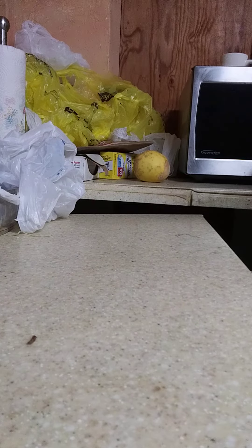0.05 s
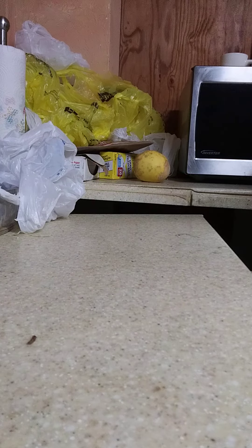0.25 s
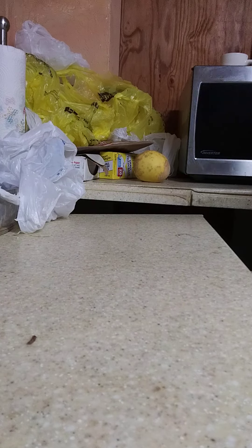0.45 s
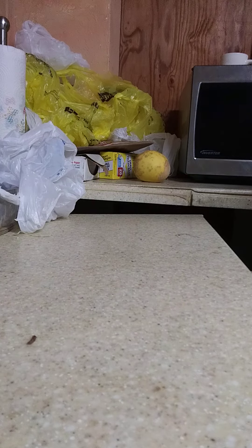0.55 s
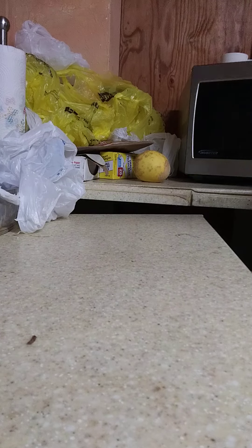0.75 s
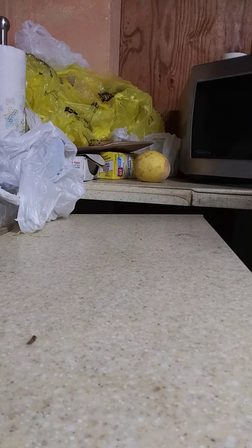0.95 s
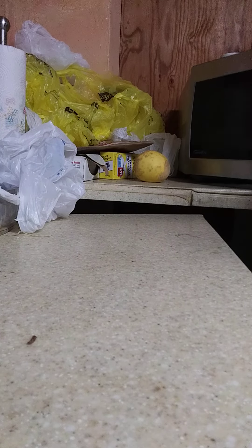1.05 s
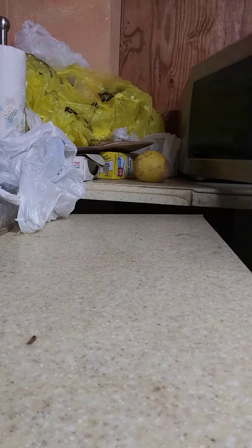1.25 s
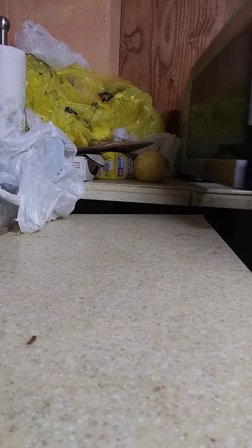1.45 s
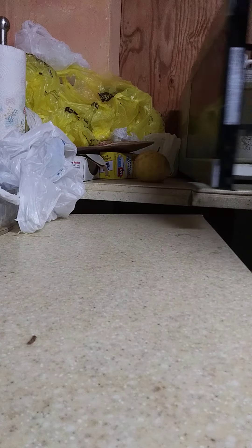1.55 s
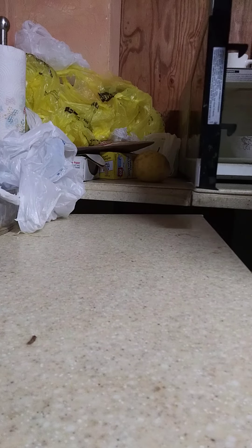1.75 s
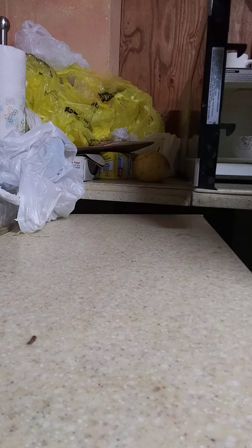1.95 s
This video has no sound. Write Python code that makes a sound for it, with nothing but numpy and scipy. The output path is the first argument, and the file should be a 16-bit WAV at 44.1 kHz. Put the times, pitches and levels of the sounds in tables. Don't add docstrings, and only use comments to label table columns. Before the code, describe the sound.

Close microphone in a home kitchen catches a microwave door being released, with ticks building to two loud metallic clunks, a few rattling knocks, then near quiet with slight hinge friction and tiny squeaks over steady room noise.

```python
import sys
import numpy as np
from scipy import signal
from scipy.io import wavfile

SR = 44100
rng = np.random.default_rng(int(sys.argv[2]) if len(sys.argv) > 2 else 0)


def unload_audio(sound):
    columns = np.transpose(np.atleast_2d(sound))
    steps = np.round(np.clip(columns, -1, 1) * 32767)
    wavfile.write(sys.argv[1], SR, steps.astype(np.int16))


def how_loud(loudness_db):
    steps = np.asarray(loudness_db, float) / 20
    return 10 ** steps


N = 88200


def rms_one(x):
    return x / np.sqrt(np.mean(x ** 2) + 1e-20)


def at_hz(points, hz):
    table_hz, values = np.array(points).T
    return np.interp(np.log(hz), np.log(table_hz), values)


def drift(rate_hz):
    step = 40
    r = np.exp(-2 * np.pi * rate_hz * step / SR)
    white = rng.standard_normal(N // step + 2002)
    slow = signal.lfilter([1], [1, -2 * r, r * r], white)[2000:]
    return np.interp(np.arange(N) / step, np.arange(len(slow)), rms_one(slow))


def resonance(x, hz, width_hz):
    r = np.exp(-np.pi * width_hz / SR)
    poles = [1, -2 * r * np.cos(2 * np.pi * hz / SR), r * r]
    return signal.lfilter([(1 - r * r) / 2, 0, (r * r - 1) / 2], poles, x)


def bands(size):
    edges = 22 * 2 ** np.arange(0, 9.7, 1 / 3)
    white = rng.standard_normal((2, size))
    out = []
    for k, (low, high) in enumerate(zip(edges, edges[1:])):
        band_filter = signal.butter(2, [low, high], "band", fs=SR, output="sos")
        out.append((np.sqrt(low * high), signal.sosfilt(band_filter, white[k % 2])))
    return out


def coloured(spectrum, patchy_db):
    return rms_one(sum(how_loud(at_hz(spectrum, hz) + patchy_db * drift(10)) * band for hz, band in bands(N)))


# start in seconds, chatter length in seconds, level in dB, colour in Hz, width in Hz.
KNOCKS = [(.000, 0.0032, -47.5, 630, 1470), (.002, 0.0074, -43.5, 2700, 1960),
          (.130, 0.021, -50, 690, 886), (.3696, 0.019, -32, 510, 253), (.127, 0.053, -40, 1810, 3500),
          (.212, .012, -33.5, 1480, 910), (.218, 0.031, -35, 1350, 400),
          (.2185, 0.015, -32, 2600, 900), (.226, 0.01, -29, 970, 219),
          (.3218, 0.014, -29.5, 1590, 380), (.322, 0.11, -31.5, 3300, 1170),
          (.338, 0.019, -30, 1810, 402),
          (0.3689, 0.00029, -17.5, 1276, 540), (.373, 0.014, -23.5, 1630, 1700),
                 (0.369, 0.0097, -21.5, 3030, 2700), (0.394, 0.017, -25.5, 2960, 2500),
                 (.432, 0.0074, -34.5, 1400, 1980), (0.4775, 0.012, -22, 1440, 1070),
                 (.483, 0.0097, -26, 1300, 1200), (.483, 0.011, -25.5, 2450, 990),
                 (.224, 0.012, -44, 545, 230), (0.6, 0.025, -62, 5200, 2600),
                 (0.491, 0.0062, -22.5, 3200, 1070), (0.664, 0.033, -36, 770, 630),
                 (.6608, 0.038, -26.5, 1480, 2000), (0.757, 0.061, -39, 370, 530),
                 (.769, 0.021, -29.5, 1400, 2250), (.771, 0.0049, -30.5, 3130, 1700),
                 (0.827, 0.016, -49, 1000, 1600), (.3695, 0.024, -36, 430, 280),
                 (.372, 0.055, -40, 770, 330), (.479, 0.019, -32, 560, 430), (.479, 0.015, -25, 3600, 1300),
                 (.661, .03, -33, 3700, 1000)]
# start in seconds, chatter length in seconds,
# level in dB, colour in Hz, width in Hz.
SPRING_TICKS = [(.1262, 0.014, -34, 7440, 1340), (.135, 0.0074, -52, 12400, 5840),
                (.180, 0.083, -45, 4400, 300), (.215, .025, -45, 6400, 2490),
                (.286, 0.01, -35.5, 7300, 1400), (.292, 0.011, -49.5, 10900, 1500),
                (.320, 0.01, -39.5, 6370, 2000), (.325, 0.0087, -50, 11500, 4000),
                (.3692, 0.0087, -24.5, 6800, 2400), (.370, .030, -58, 12500, 6000),
                (.392, 0.016, -33, 7160, 3920), (.4775, 0.015, -29.5, 6060, 1790),
                (.661, 0.0064, -36.5, 6200, 1480), (.665, 0.027, -40.5, 7400, 2460),
                (.746, 0.04, -45.5, 6740, 2000), (.769, 0.018, -37, 6230, 3520),
                (.769, 0.0092, -46.5, 12100, 6720)]
# frequency in Hz, level in dB, decay time T60 in seconds.
CABINET_MODES = [(477, 20.5, 0.05), (557, 17, 0.13), (837, 16, 0.05), (970, 7.5, 0.057), (1100, -3, 0.059),
                 (1202, 8, 0.1), (1300, 7, 0.14), (1344, 8.5, 0.07), (1485, 9, 0.09), (1593, 2.5, 0.097),
                 (1793, -13, 0.2), (2400, 8, 0.06), (2600, 2, 0.052)]


def contacts(rows):
    chatter_per_s, chatter_spread_db = 5000, 2.8
    cabinet_db, damping = -22, 0.45
    size = 6144
    out = np.zeros((3, N + SR))
    t = np.arange(size) / SR
    for k, (s, length, db, hz, width_hz) in enumerate(rows):
        chance = rng.random(size)
        sizes = np.minimum(rng.exponential(1, size), 4)
        shares_db = rng.normal(0, 2.3, len(CABINET_MODES))

        signs = np.sign(chance * 1e6 % 2 - 1)
        clicks = (chance < chatter_per_s / SR) * how_loud(chatter_spread_db * sizes) * signs
        clicks = clicks * np.interp(t / length, [0, 0.32, 0.7, 1], [0.93, 0.76, 0.26, 0.0017]) + 1e-18
        clicks[0] = -np.sqrt(0.001 / max(length, 0.001))

        part = resonance(resonance(clicks, hz, 1.34 * width_hz), hz, 1.34 * width_hz)
        top_hz = min(hz + 1.64 * width_hz, 19000)
        part = signal.sosfilt(signal.butter(2, top_hz, fs=SR, output="sos"), part)
        part = 5 * part / np.sqrt(np.sum(part ** 2))

        shell = np.zeros(size)
        for (mode_hz, mode_db, t60), share_db in zip(CABINET_MODES, shares_db):
            if mode_hz < hz + width_hz and hz < 4000:
                ring = resonance(part, mode_hz, 2.2 / (t60 * damping))
                shell += how_loud(cabinet_db + mode_db + share_db) * ring * np.sqrt(width_hz * t60)
        i = int(s * SR)
        out[k % 3, i:i + size] += how_loud(db) * (part + shell)
    return out[:, :N]


# start in seconds, peak level in dB, colour in Hz.
SHARP_SNAPS = [(0.2113, -32.5, 1490), (0.223, -27, 2600), (.2294, -24, 1100), (0.235, -26.5, 1230),
               (0.3734, -12.5, 1410), (.3762, -24, 3740), (0.3775, -30, 6930), (0.3822, -17, 2000),
               (0.393, -31, 4000), (0.3974, -27, 6600), (.4012, -28, 3500), (.4035, -44, 7500),
               (.4085, -34, 6500), (.4135, -43, 7450), (0.3198, -39, 7300), (.4772, -23, 1700),
               (.4836, -19, 1600), (.4855, -11, 1500), (.4883, -11, 1500), (.4937, -20, 2000),
               (0.661, -19.5, 1670), (0.6646, -23, 1830), (0.6653, -22.5, 6200), (.6668, -48, 9350),
               (0.6681, -18.5, 2520), (0.6703, -22.5, 1600), (0.6823, -27, 2200), (0.6863, -26, 1810),
               (.7020, -50, 6300), (0.287, -44, 7700), (0.298, -42, 7500), (.7795, -26, 2520)]


def snaps():
    out = np.zeros(N)
    click = np.eye(1, 512)[0]
    for s, db, hz in SHARP_SNAPS:
        width_hz = min(0.76 * hz, 2000)
        pulse = resonance(resonance(click, hz, width_hz), hz, width_hz)
        i = int(s * SR)
        out[i:i + len(click)] += how_loud(db) * pulse / np.max(np.abs(pulse))
    return out


# start in seconds, frequency in Hz, level in dB,
# rise in seconds, decay time T60 in seconds.
PANEL_BOOMS = [(0.232, 263.4, -44.5, 0.0089, 0.5), (0.234, 149.8, -42, 0.059, 0.59),
               (0.371, 272.6, -25.5, 0.0061, 0.23), (.384, 160.8, -20, 0.0053, 0.21),
               (0.409, 133.7, -25, 0.014, 0.46), (0.48, 285.2, -34.5, 0.0013, 0.53),
               (0.501, 161.8, -34, 0.0042, 0.31), (0.542, 260, -69, 0.025, 0.27),
               (0.595, 283.4, -41, 0.011, 0.42), (0.633, 134.5, -51, 0.011, 0.62),
               (.670, 278.8, -37.5, 0.0073, 0.49), (0.679, 151, -44, 0.045, 0.39),
               (0.779, 289, -36, 0.0068, 0.16), (0.825, 144.3, -45.5, 0.0092, 0.35),
               (0.888, 274.7, -44.5, 0.0038, 0.21), (0.389, 94, -39, 0.014, 0.29),
               (0, 63, -49.5, 0.0022, 0.11), (0, 154, -48.5, 0.0018, 0.087), (.525, 53, -48, .015, 0.14),
               (.14, 270.5, -44.5, 0.025, 0.18), (0.141, 152, -54.5, 0.019, 0.32)]


def booms():
    thud_db, thud_hz, thud_width_hz = -12, 228, 270
    out, t = np.zeros(N), np.arange(N) / SR
    thud = rms_one(resonance(rng.standard_normal(N), thud_hz, thud_width_hz))
    waver = how_loud(3.0 * drift(31.5))
    wander_s = 0.025 * np.cumsum(drift(26)) / SR
    for s, hz, db, rise, t60 in PANEL_BOOMS:
        u = np.maximum(t - s, 0)
        envelope = how_loud(db - 60 * u / t60) * (1 - np.exp(-u / rise))
        tone = waver * np.sin(2 * np.pi * hz * (u + wander_s))
        out += envelope * (tone + how_loud(thud_db) * thud)
    return out


# time in seconds, level in dB.
SWING_LEVEL = [(.95, -65.5), (1.2, -72), (1.26, -63), (1.42, -61), (1.54, -56), (1.7, -58), (1.85, -57.5),
               (1.95, -54.5), (2.0, -54.5)]
# frequency in Hz, level in dB per Hz.
RUB_SPECTRUM = [(250, -33), (500, -2.5), (1000, 1.5), (1600, 0), (2000, -4.5), (2700, 1.5), (6000, -8.5),
                (12000, -22)]
# frequency in Hz, width in Hz, level in dB.
RUB_RESONANCES = [(1060, 23.5, -8), (1360, 34, -1), (1590, 170, 1.5), (2600, 260, -0.5), (6000, 180, -4)]


def hinge_rub():
    rub = coloured(RUB_SPECTRUM, patchy_db=1.0)
    rings = rms_one(sum(how_loud(db) * resonance(rub, hz, width_hz) for hz, width_hz, db in RUB_RESONANCES))
    level_db = np.interp(np.arange(N) / SR, *np.transpose(SWING_LEVEL), left=-90)
    hiss = how_loud(0.52 * (level_db + 44)) * rub
    return how_loud(level_db) * rms_one(hiss + how_loud(-8.5) * rings)


# start in seconds, length in seconds, start, middle and end pitch in Hz.
HINGE_SQUEAKS = [
    (1.437, 0.07, 7200, 9000, 10500),
    (1.515, 0.085, 8500, 9250, 8500),
    (1.73, .075, 11500, 11450, 11350),
    (1.885, 0.035, 10500, 10900, 11300),
    (1.93, .06, 9300, 9650, 9200),
    (1.945, .02, 7300, 7800, 8300),
]


def hinge_squeaks():
    out, t = np.zeros(N), np.arange(N) / SR
    for s, length, start_hz, middle_hz, end_hz in HINGE_SQUEAKS:
        u = np.clip((t - s) / length, 0, 1)
        glide = np.polyfit([0, 0.5, 1], [start_hz, middle_hz, end_hz], 2)
        hz = np.polyval(glide, u) * (1 + 0.003 * drift(60))
        swell = np.sqrt(np.sin(np.pi * u) + 1e-9) * (u < 1) * (u > 0)
        out += how_loud(-74 + 1.5 * drift(40)) * swell * np.sin(2 * np.pi * np.cumsum(hz) / SR)
    return out


# frequency in Hz, decay time T60 in seconds.
ROOM_T60 = [(150, 0.29), (500, 0.46), (1500, 0.32), (3500, 0.33), (7000, 0.18), (11000, 0.11)]


def kitchen(x):
    room_db, build_s = 2.5, 0.0045
    near_db, near_s, near_edge_s = 8.0, 0.014, 0.004
    t = np.arange(SR // 2) / SR
    near = how_loud(near_db * (1 - np.tanh((t - near_s) / near_edge_s)) / 2)
    shape = (1 - np.exp(-(t / build_s) ** 2)) * near
    tail = np.zeros(len(t))
    for hz, band in bands(len(t)):
        decay = how_loud(-60 * t / at_hz(ROOM_T60, hz))
        tail += np.sqrt(hz) * rms_one(band * shape * decay)
    return how_loud(room_db) * signal.fftconvolve(x, tail / np.sqrt(np.sum(tail ** 2)))[:N]


# frequency in Hz, level in dB per Hz.
AIR_SPECTRUM = [(25, -21), (100, -8.5), (250, -3.5), (600, -9.5), (1500, -5.5), (2400, -9.5), (4500, -19.5),
                (16000, -31.5)]
# frequency in Hz, level in dB.
APPLIANCE_TONES = [(1010, -76.5), (482, -68), (950, -72.5), (1556, -67.5), (2279, -65)]


def air():
    t = np.arange(N) / SR
    out = how_loud(-57.5) * coloured(AIR_SPECTRUM, patchy_db=0.6)
    for hz, db in APPLIANCE_TONES:
        level = how_loud(db + 1.0 + 1.0 * drift(13.0))
        out += level * np.sin(2 * np.pi * hz * t + rng.uniform(0, 16.6))
    return out


# frequency in Hz, width in Hz, level in dB.
MIC_DIPS = [(4796, 1300, -7.5)]


def scene():
    sharp = snaps()
    spots = contacts(KNOCKS) + contacts(SPRING_TICKS)
    hits = sharp
    for spot in spots:
        hits = hits + spot + kitchen(spot + how_loud(-8) * sharp)
    hits = signal.sosfilt(signal.butter(2, 112, "high", fs=SR, output="sos"), hits)
    sound = hits + booms() + hinge_rub() + hinge_squeaks() + air()
    for hz, width_hz, db in MIC_DIPS:
        sound = sound - (1 - how_loud(db)) * resonance(sound, hz, width_hz)
    return sound[None]


def roll_off(x):
    return signal.sosfilt(signal.butter(12, 16580, fs=SR, output="sos"), x)


def record(dry):
    duck_from_db, duck_share, attack_s, release_db_per_s = -22, 0.52, 0.014, 59
    dry = signal.sosfilt(signal.butter(2, 45, "high", fs=SR, output="sos"), dry)
    over_db = np.maximum(20 * np.log10(np.abs(dry[0]) + 1e-9) - duck_from_db, 0)
    ramp = release_db_per_s * np.arange(N) / SR
    held_db = np.maximum.accumulate(over_db + ramp) - ramp
    r = np.exp(-1 / (attack_s * SR))
    mix = dry * how_loud(-duck_share * signal.lfilter([1 - r], [1, -r], held_db))
    mix = signal.sosfilt(signal.cheby2(14, 60, 16500, fs=SR, output="sos"), mix)
    return roll_off(mix)


dry = scene()
out = record(dry)
unload_audio(out)
```